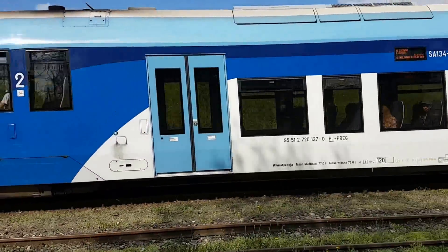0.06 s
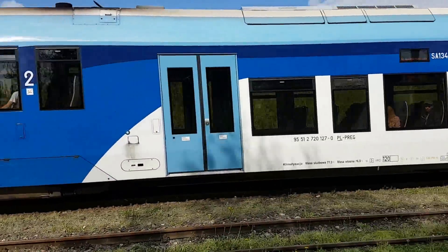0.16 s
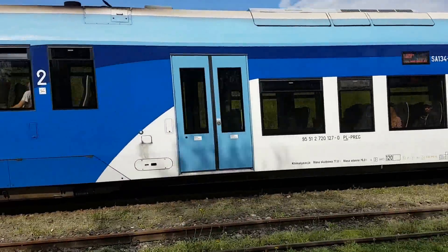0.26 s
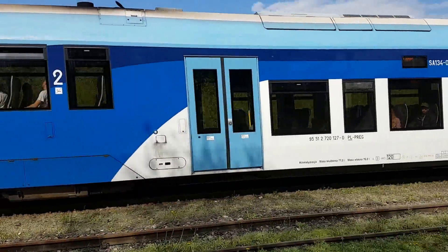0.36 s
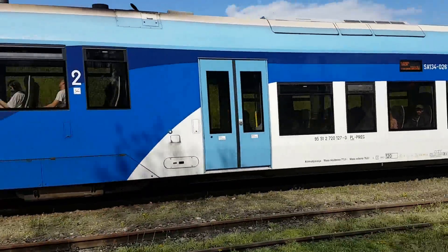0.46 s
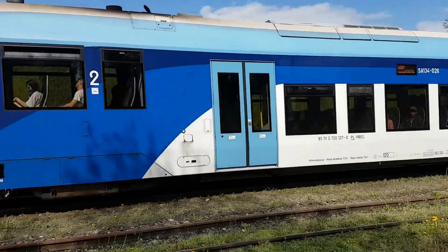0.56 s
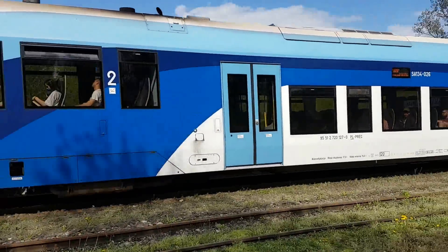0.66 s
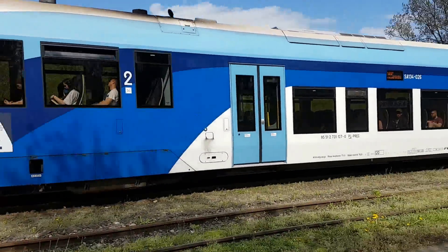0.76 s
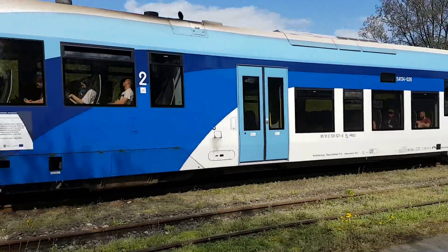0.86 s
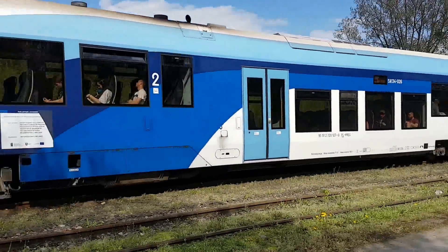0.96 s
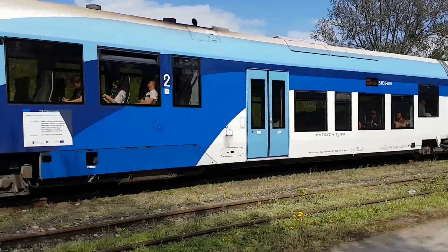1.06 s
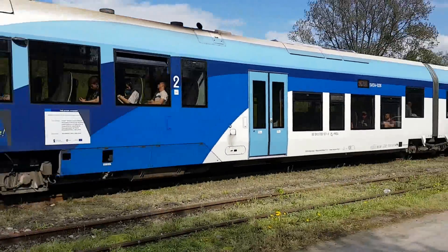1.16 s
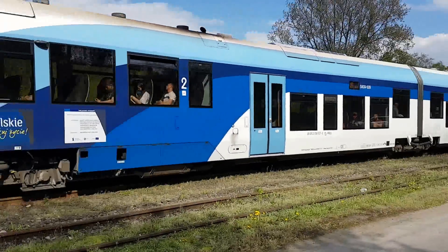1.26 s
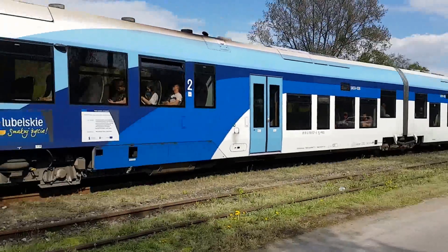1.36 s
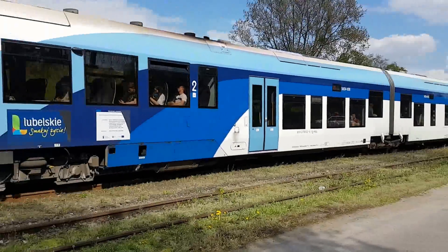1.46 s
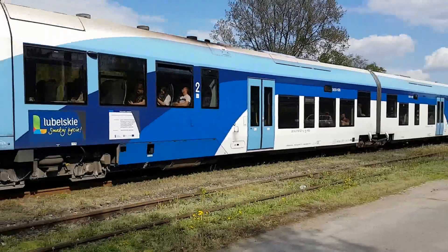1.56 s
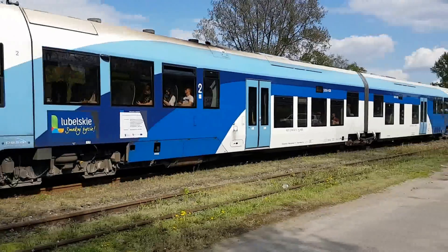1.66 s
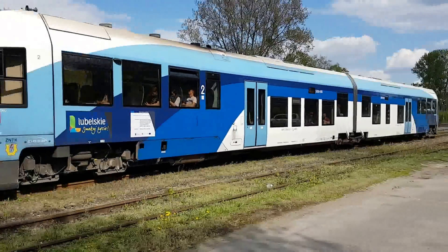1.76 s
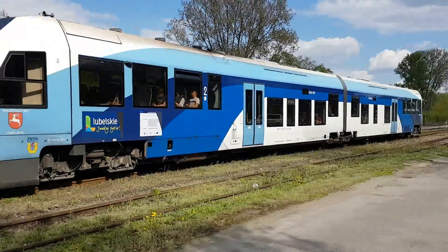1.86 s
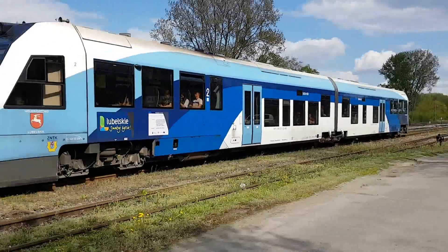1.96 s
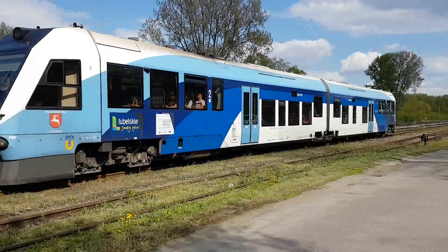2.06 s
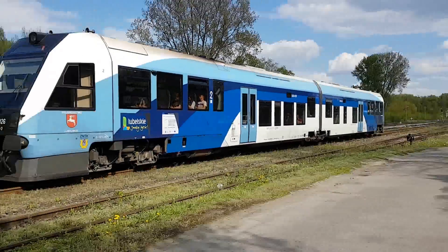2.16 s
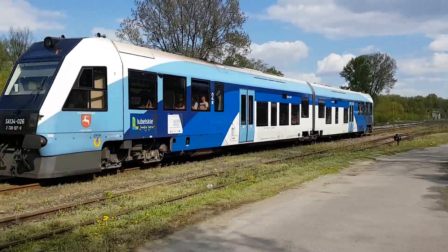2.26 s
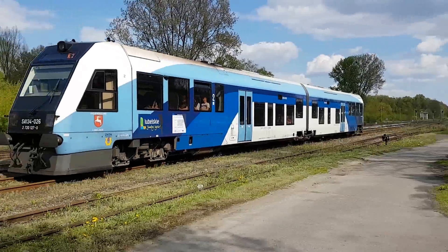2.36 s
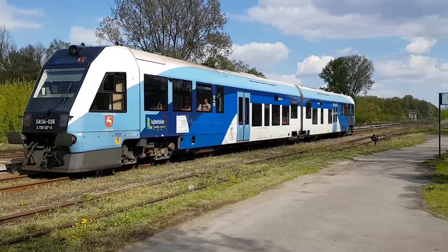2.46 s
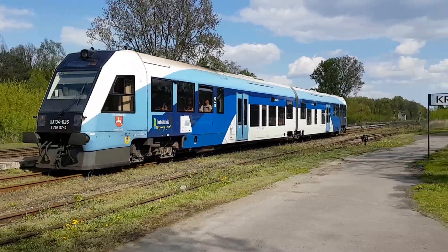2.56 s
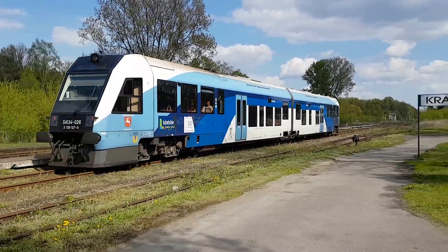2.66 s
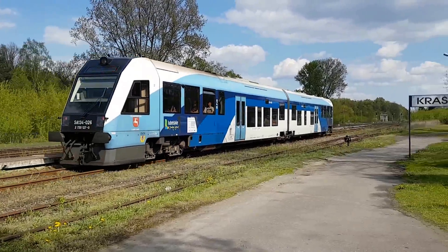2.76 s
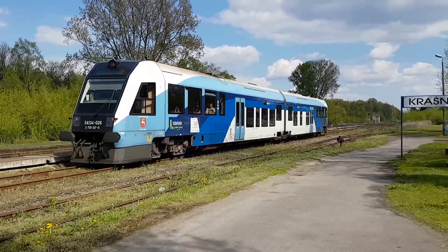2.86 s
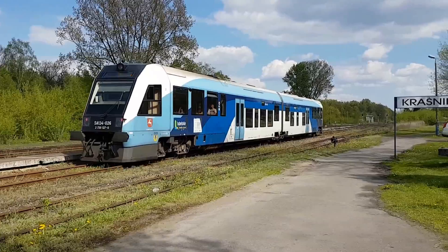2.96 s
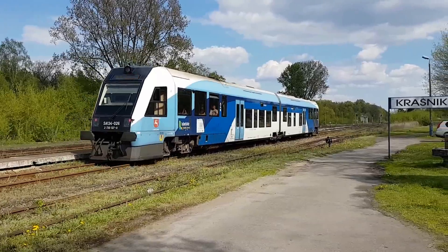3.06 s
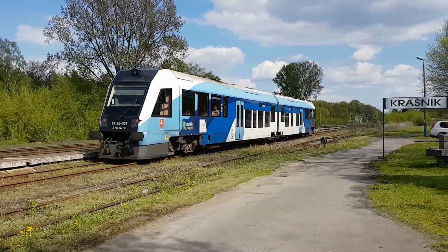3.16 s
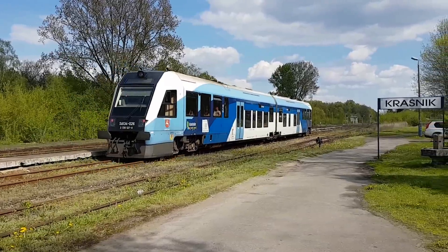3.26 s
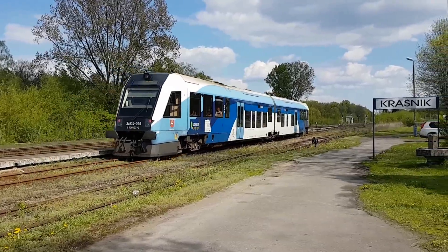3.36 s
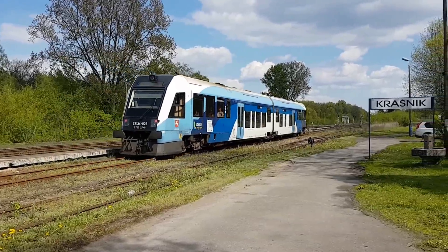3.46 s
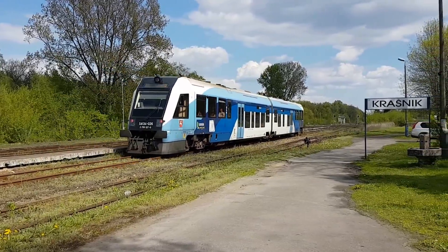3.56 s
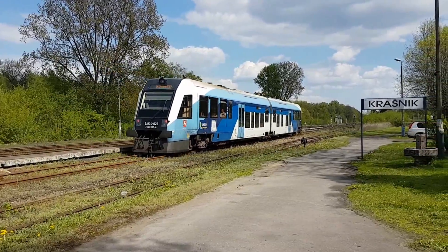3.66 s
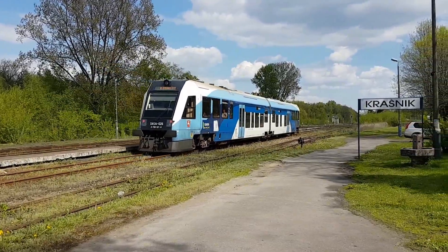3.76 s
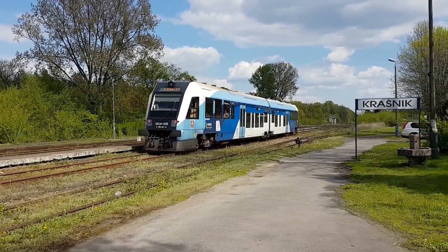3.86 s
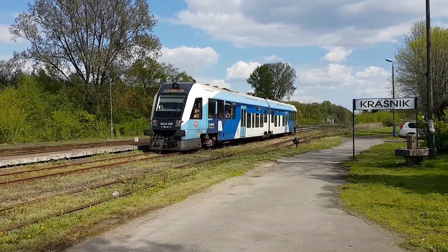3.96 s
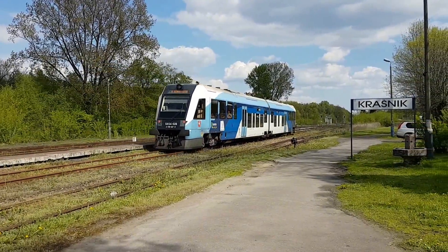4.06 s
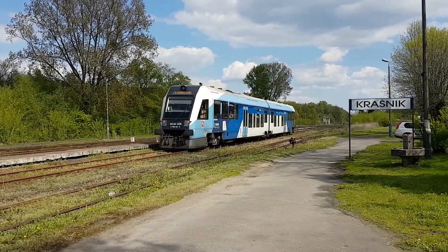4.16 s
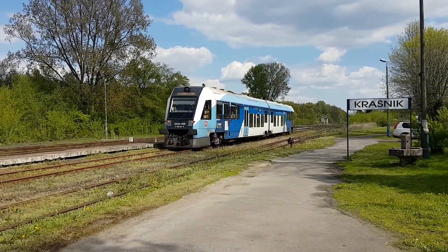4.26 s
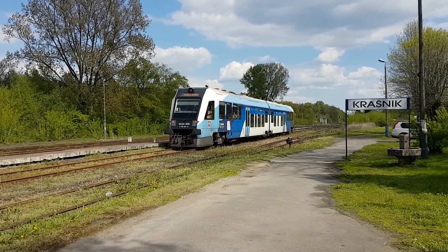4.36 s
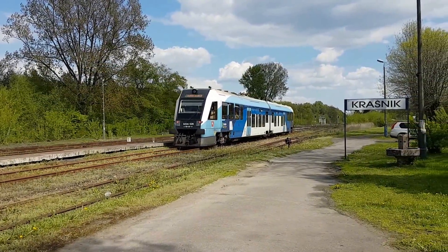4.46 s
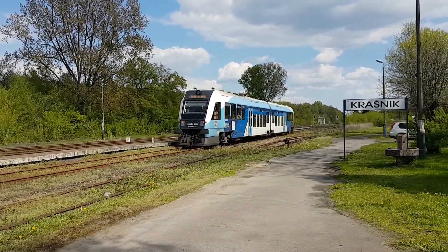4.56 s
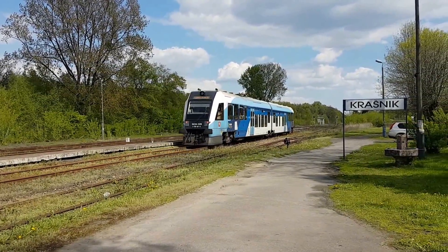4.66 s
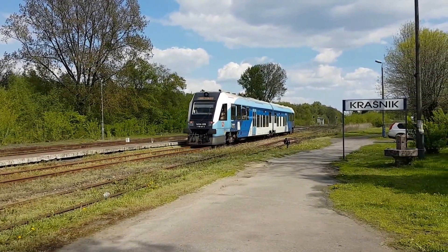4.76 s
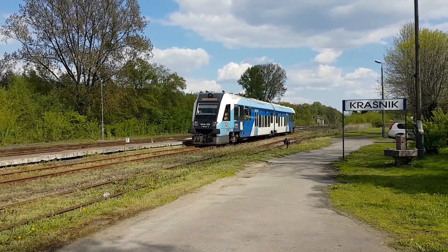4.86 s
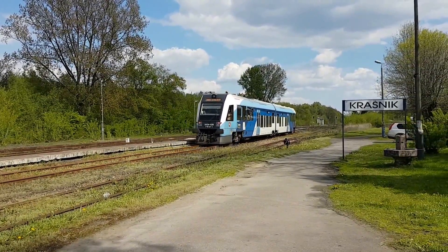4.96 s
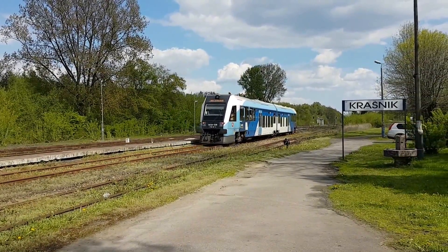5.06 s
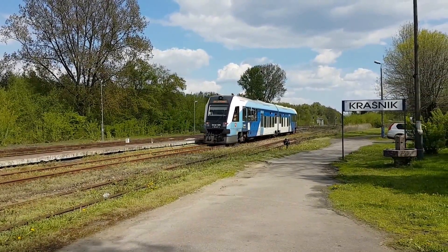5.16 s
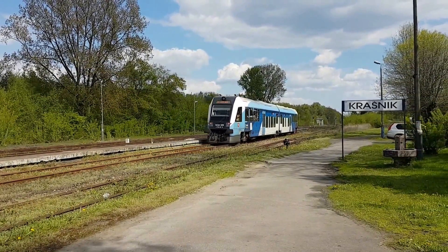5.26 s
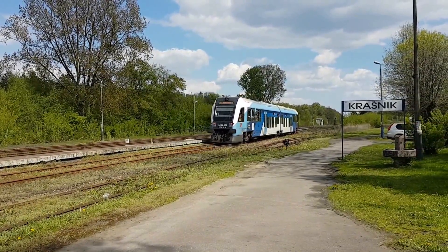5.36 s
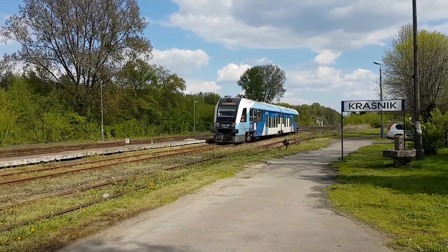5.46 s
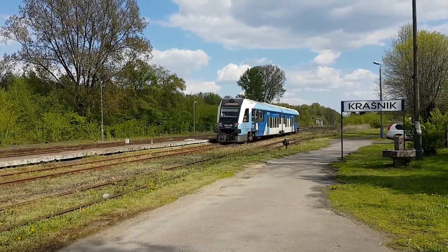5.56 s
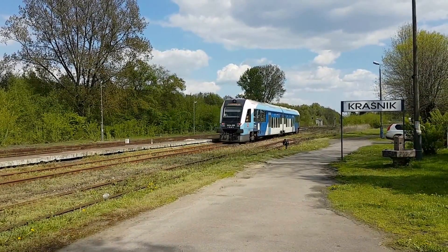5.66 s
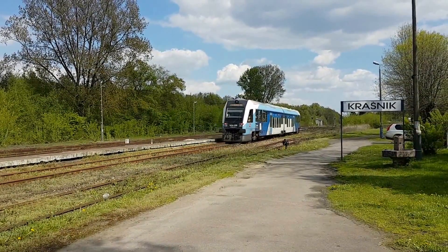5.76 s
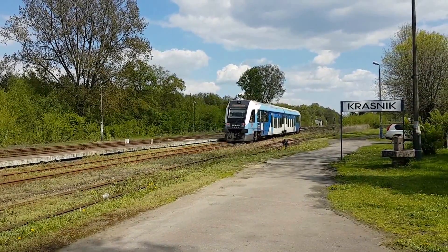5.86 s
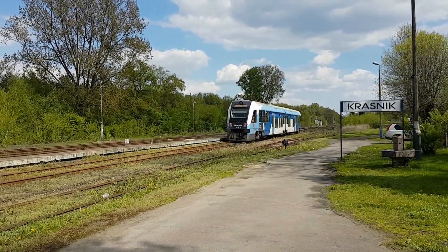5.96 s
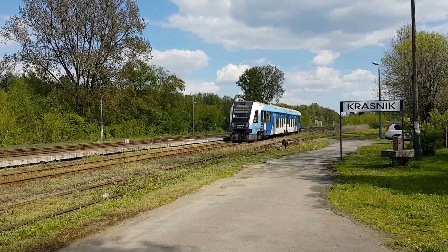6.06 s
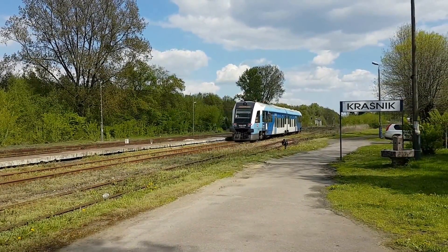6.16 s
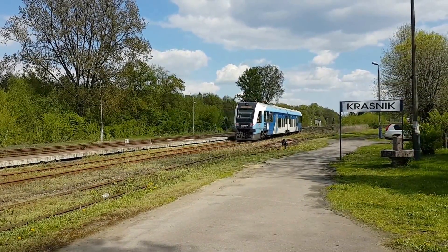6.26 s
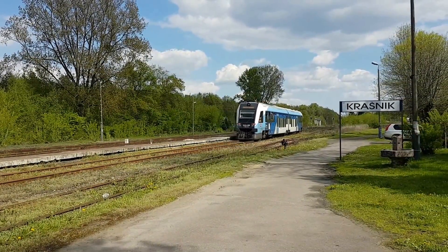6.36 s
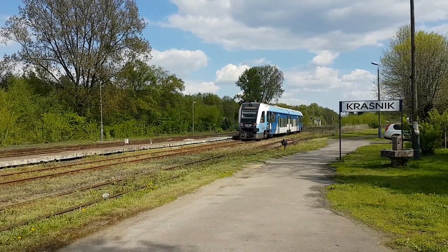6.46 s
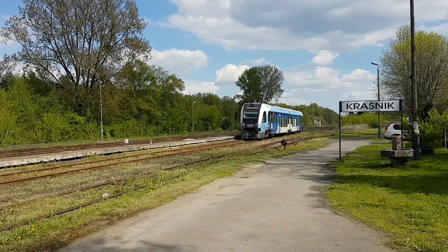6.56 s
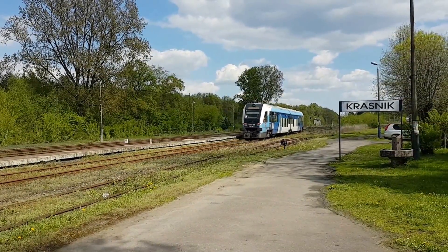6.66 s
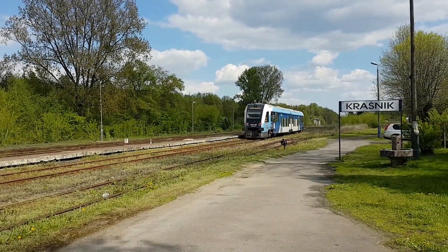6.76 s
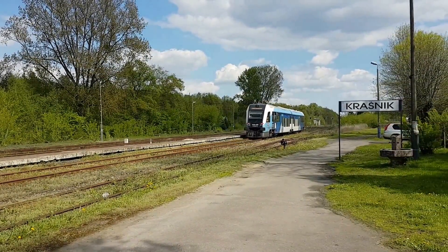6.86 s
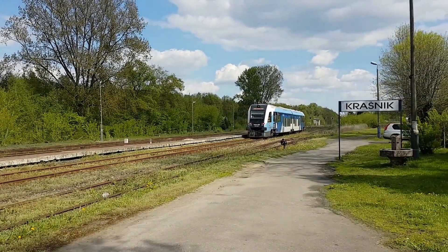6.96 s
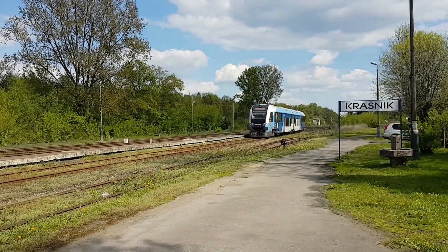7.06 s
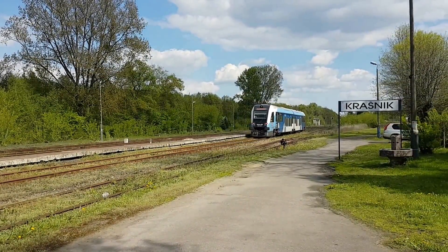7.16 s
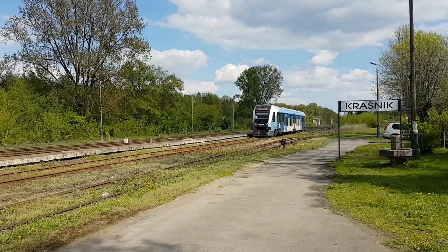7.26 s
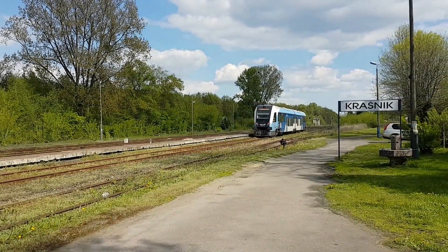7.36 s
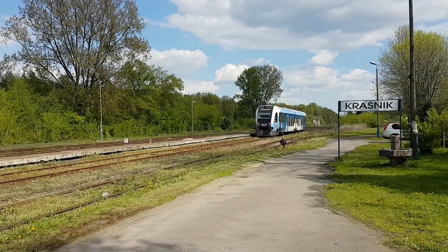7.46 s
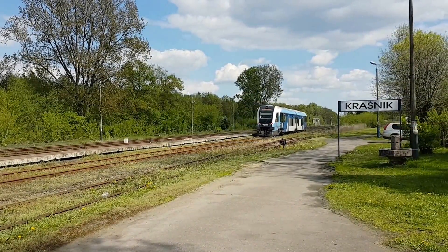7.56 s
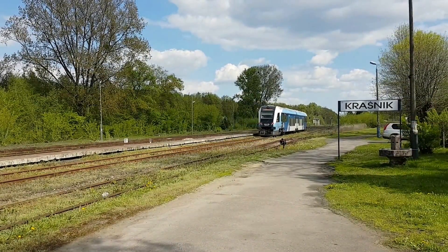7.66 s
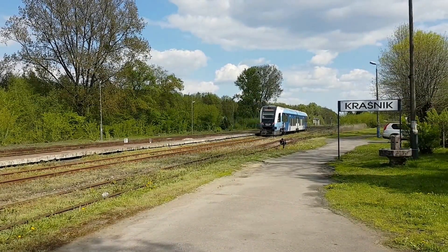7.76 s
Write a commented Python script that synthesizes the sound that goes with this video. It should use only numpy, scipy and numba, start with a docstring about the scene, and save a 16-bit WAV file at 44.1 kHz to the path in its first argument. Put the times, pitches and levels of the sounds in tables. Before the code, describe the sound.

A diesel railcar is already passing close to a phone beside the track. Its engine booms under throttle over rumbling, roaring wheels, and a high breathy turbocharger whistle peaks near 1.3 seconds, then sinks. By 2.3 seconds the engine has dropped to a throbbing idle, and the train steadily recedes. From 1.7 seconds wheels thump over rail joints, strongest near 2.8 seconds and in a cluster from 4.3 to 4.7. Gears hum low, wheels ring, and a thin flange whine peaks near 2.8 seconds with a faint hiss. Wind flutters on the microphone, with puffs on the right, hardest just after 5 seconds. Around 5.5 seconds the bass drops away. From 6 to about 7 seconds a bird gives a run of faint, short chips among the last distant joint clatters and two thin, close ticks. The faint train lingers over soft outdoor background until nearly 8 seconds.

```python
"""A two-car diesel railcar rolls past a phone beside the track and draws away down the line.
First the engine booms under throttle, wheels roar and the turbocharger whistles. By 2.3 s the
engine has dropped to a throbbing idle. From 1.7 s wheels thump over rail joints; gears hum, wheels
ring and a flange sings. Wind puffs hit the right microphone port, hardest near 5 s, then the bass
drops away. From 6 s a bird chips in the quiet, among the last joints and two thin ticks."""
import sys
import numpy as np
from scipy import signal
from scipy.fft import rfft, irfft, next_fast_len
from scipy.io import wavfile
from scipy.ndimage import uniform_filter1d, map_coordinates
from numba import njit

SR = 44100
rng = np.random.default_rng(int(sys.argv[2]) if len(sys.argv) > 2 else 0)


def unload_audio(sound):
    """Save the sound as a 16-bit wav file, at the path given as the first command line argument."""
    columns = np.transpose(np.atleast_2d(sound))
    # keep every value between -1 and 1, then stretch to whole-number steps
    steps = np.round(np.clip(columns, -1, 1) * 32767)
    wavfile.write(sys.argv[1], SR, steps.astype(np.int16))


N = 343967
TIME_S = np.arange(N) / SR

# engine speed: time_s, firing_hz
ENGINE_SPEED = [(0, 85), (.75, 85.87), (1.35, 78.97), (1.8, 64.8), (2.3, 51.94), (2.6, 48.98), (3.5, 50.84),
                (7.8, 52.87)]
# firings of one crank turn: level_db
CYLINDERS_DB = [0.5, -6, 5]
# exhaust pipe resonances: centre_hz, width_hz, gain_db
PIPE_MODES = [(180.3, 43, 0.5), (278.4, 72, -1), (322.4, 48, -2)]

# noise spectra: freq_hz, density_db
BOOM_COLOUR = [(80, -46), (120, -2), (160, 1), (210, 5), (260, 2.5), (340, -3), (385, -18), (500, -31),
               (700, -63)]
BAY_COLOUR = [(180, -39), (300, -22), (331, -1.5), (461, -14.5), (652, -9.5), (1000, -14), (1200, -17),
              (1570, -12.5), (2290, -19.5), (4080, -24.5), (6280, -32), (8040, -27.5), (9180, -38),
              (10800, -33), (15600, -39)]
RUMBLE_COLOUR = [(15, -42), (25, -37), (43, -10), (71, -9), (102, -3), (130, -2.5), (172, 0), (201, -1.5),
                 (225, -3.5), (259, -5.5), (305, -7.5), (393, -23), (520, -20), (680, -27), (1140, -120)]
WHEEL_COLOUR = [(220, -40), (380, -5), (686, -5), (1060, -9), (2100, -8), (3050, -13.5), (3400, -11),
                (6940, -22), (9190, -33.5), (13300, -35.5), (15600, -41)]
BREEZE_COLOUR = [(20, -32), (50, -2), (120, 6), (250, -18), (500, -28)]
FIELD_COLOUR = [(15, -47), (25, -33), (43, -10), (75, -1.5), (156, -12), (240, -38), (267, -8.5),
                (470, -14.5), (668, -11), (1240, -21), (7330, -43.5), (9340, -48), (15600, -46)]
# broad resonances of engine bay, wheels and rails: centre_hz, width_hz, lift_db
BAY_RINGS = [(690, 180, 3), (736, 34, 3), (990, 170, 4), (1530, 110, 1), (4170, 360, 2), (7830, 190, 4),
             (10060, 1500, 8), (13700, 1200, 3)]
WHEEL_RINGS = [(675, 230, 6), (1392.5, 410, 5.5), (2083.5, 350, 7.5), (2868, 145, 6), (3427, 190, 7),
               (4127, 490, 4.5), (4765, 330, 7), (5430, 130, 7.5), (7500, 1200, 2.5), (8200, 300, 9),
               (10050, 730, 7.5), (11900, 400, 7), (13400, 1320, 8.5)]

# swells: peak_s, peak_db, rise_s_per_10db, fall_s_per_10db
FIRING_SURGES = [(.4, -16, 0.5, 0.14), (.75, -18, 0.21, 0.13), (1.5, -22.5, 0.22, 0.45),
                 (2.05, -24, 0.24, 0.13)]
TURBO_SWELLS = [(.65, -39, 0.9, 1.004), (1.32, -32.5, 0.38, .2)]
BOGIE_SWELLS = [(0, -35, .5, 0.55)]
FLANGE_SWELLS = [(2.4, -50, 0.31, .8), (2.77, -44.5, 0.13, 0.07), (3.2, -54, 1.5, 0.65),
                 (4.3, -60, 3.5, .17), (6.3, -69.5, 3.5, 0.96)]
HISS_SWELLS = [(2.1, -65, .2, 2.5), (2.8, -55, .5, .8), (4.7, -66, 1.6, .3), (6.26, -63, .06, .07)]
GUSTS = [(.5, -36.5, 2.5, 1.9), (4.2, -39.5, .4, 1.9), (5.1, -27.5, 0.24, 0.24), (7.1, -46.5, 0.23, 0.36)]
# whistle centres: time_s, pitch_hz
TURBO_PITCH = [(0, 10900), (.6, 11000), (.95, 10900), (1.3, 10400), (1.75, 9100)]
FLANGE_PITCH = [(2.2, 7370), (4.3, 6550), (4.6, 6870), (5.5, 7200), (7.8, 7350)]
# gearbox hums: time_s, pitch_hz, level_db
LOW_HUM = [(1.2, 239.8, -26), (2.6, 231.2, -23.5), (3.8, 229.5, -38.5), (5.1, 232, -37),
           (7.8, 237.1, -42.5)]
HIGH_HUM = [(2.3, 297.5, -33.5), (3, 300.8, -34), (4.5, 307.3, -37.5)]

# rough track: centre_s, lift_db, half_length_s
ROUGH_TRACK = [(0, 2.5, 0.36), (4.8, 1, 0.27), (6.357, 4.5, 0.28), (7.197, 1, 0.23)]
# wheel treble: time_s, loss_at_7khz_db
TREBLE_LOSS = [(0, 5), (2, 6), (4.3, -3.5), (4.8, -1), (5.7, 3), (6.3, 11), (7.8, 11)]
# rail joints: time_s, gain_db, thud_hz, clatter_db, shudder_db
JOINTS = [(1.699, -22, 228, -20, 4), (2.14, -10.5, 201, -23, -3), (2.599, -14, 178, -29, -1),
          (2.759, -7, 96.9, -20, 3), (3.619, -20, 228, -46, 10), (4.289, -18.5, 191.7, -18, 7),
          (4.459, -17, 125.4, -16, 14), (4.579, -14, 169, -28, 10), (4.619, -14, 171, -21, -2),
          (4.678, -7, 98, -23.5, 1), (5.206, -13.5, 184, -21, 3), (6.215, -27.5, 102, -4.5, 16),
          (6.25, -25.5, 112.5, -22, 14), (6.429, -24, 106.8, -10.5, 17.5), (6.499, -25.5, 177, -10.5, 4.5),
          (6.87, -39.5, 161, 4, 28.5)]
# wind puffs: centre_s, gain_db, half_length_s
PUFFS = [(0.048, -15.5, .02), (3.75, -19, 0.017), (4.35, -30, 0.038), (5.002, -10, .012),
         (5.033, -16, 0.012), (5.11, -8, 0.012), (5.16, -3.5, 0.008), (5.42, -28, .03), (6.541, -32, 0.018),
         (7.157, -27, 0.013)]
# bird chips, close ticks: start_s, gain_db
CHIPS = [(6.0372, -43), (6.2136, -46), (6.364, -44), (6.5131, -40), (6.6445, -41), (6.778, -39.5),
         (6.9077, -44), (7.0996, -43)]
TICKS = [(6.127, -39), (6.3425, -42)]

# port likeness for train alongside, train ahead, open field: freq_hz, correlation
NEAR_ALIKE = [(60, 1), (290, 0.97), (640, 0.86), (1410, 0.81), (3100, 0.067), (6820, 0.14), (15000, 0.092)]
FAR_ALIKE = [(60, 1), (130, 1), (290, 0.5), (640, 1), (1410, 0.36), (3100, 0.45), (6820, 0.15),
             (15000, 0.15)]
FIELD_ALIKE = [(60, 1), (130, 0.95), (290, 0.91), (640, 0.77), (1410, -0.63), (3100, -0.33), (6820, -0.34),
               (15000, 0.037)]
# port mismatch: freq_hz, left_minus_right_db
PORT_BALANCE = [(60, -1.5), (200, -1), (380, -1.5), (700, 0.5), (1290, -1.5), (2400, 2.5), (4400, 1.5),
                (7200, 10), (9000, 0.5), (11000, 0), (15000, 1)]

TRACK_M, SPEED_M_S, TAIL_PASSES_S = 8.76, 9.72, 1.576


def engine(drop_db):
    """Firing tone plus uneven blows ringing the exhaust pipe; also returns the blows at mean 1."""
    idle_hz, run_hz, throb_hz = 56, 78.4, 6
    firing_hz, = curves(ENGINE_SPEED)
    throttle = np.clip((firing_hz - idle_hz) / (run_hz - idle_hz), 0, 1)
    floor_db = -37.5 + spread_db(linger_s=3.27) + 0.45 * drop_db  # the deep tone carries far
    tone_db = np.maximum(swells_db(FIRING_SURGES), floor_db) + 2 * (1 - throttle) * walk(rate_hz=16)
    bark_db = -29.5 + 11 * throttle + spread_db() + drop_db
    cycles = np.cumsum(firing_hz * (1 + 0.0043 * walk(rate_hz=15))) / SR
    firing = cycles.astype(int)
    scatter_db = 7.1 * rng.standard_normal(N // 100)[firing]
    blow_db = np.take(CYLINDERS_DB, firing % len(CYLINDERS_DB)) + scatter_db
    blows = undb(blow_db) * np.exp(-(cycles % 1) / 0.074)
    pipe = 0
    for k, (hz, width_hz, db) in enumerate(PIPE_MODES):
        centre_hz = np.full(N, float(hz))
        mode = svf(svf(blows, centre_hz, float(width_hz)), centre_hz, 2.4 * width_hz)
        pipe += (-1) ** k * undb(db) * mode
    throb = np.cos(phase_rad(throb_hz * (1 + .3 * walk(rate_hz=3))))
    tone = np.sqrt(2) * np.sin(2 * np.pi * cycles) * (1 + .65 * (1 - throttle) * throb)
    return undb(tone_db) * tone + undb(bark_db) * unit_rms(pipe), blows / np.mean(blows)


def boom():
    """Low roar that sags, then dies quickly as the engine slows."""
    db = -13 - 3 * TIME_S - 47 * after(1.77)
    return undb(db) * roar(BOOM_COLOUR, NEAR_ALIKE, flicker_db=0.5, swell_db=0.37)


def engine_bay(blows):
    """Bay roar, partly gated by combustion knock once a firing."""
    gain = undb(-21 - 12 * after(1.14)) * (1 + 0.028 * (blows - 1))
    return gain * roar(BAY_COLOUR, NEAR_ALIKE, flicker_db=-0.26, swell_db=1.13, rings=BAY_RINGS)


def rail_rumble(lift_db):
    """The near rails carry the rumble on after the last cab."""
    db = -19.5 + spread_db(linger_s=0.55) + lift_db
    return undb(db) * roar(RUMBLE_COLOUR, NEAR_ALIKE, flicker_db=-1.26, swell_db=-0.26)


def wheel_roar(db):
    """Rolling noise with broad rings of wheels and rails."""
    loss_db, = curves(TREBLE_LOSS)
    return undb(db) * roar(WHEEL_COLOUR, FAR_ALIKE, flicker_db=.7, swell_db=.45,
                           loss_at_7khz_db=loss_db, rings=WHEEL_RINGS)


def rail_joints():
    """Each wheel drop thuds, shakes the sleepers and rattles rail and ballast."""
    out, t = np.zeros((2, N)), np.arange(SR // 4) / SR
    tail = np.minimum(t / 0.026, 1) * np.exp(-t / 0.033)
    for time_s, db, thud_hz, clatter_db, shudder_db in JOINTS:
        thud = np.sin(2 * np.pi * thud_hz * t) * (t / 0.011) * np.exp(1 - t / 0.0077)
        noise = rng.standard_normal((4, len(t)))
        shudder = undb(shudder_db) * bandpass(noise[3], 120, 340, order=3)
        rattle = bandpass(noise[0] + 0.64 * noise[1:3], 400, 3200, order=3)
        clank = 3.7 * bandpass(noise[0], 450, 900, order=2)
        clatter = undb(clatter_db) * (rattle + clank)
        add(out, time_s - .006, undb(db) * (thud + tail * (shudder + clatter)))
    return out


def gear_hum(table, waver_db, drift):
    """Fluttering gearbox tone, faded in and out at the ends of its table."""
    hz, db = curves(table)
    fade = ramp(table[0][0], 0.31) * np.clip((table[-1][0] + .1 - TIME_S) / 0.086, 0, 1)
    tone = np.sqrt(2) * np.sin(phase_rad(hz * (1 + drift * walk(rate_hz=20))))
    return fade * undb(db + waver_db * walk(rate_hz=18)) * tone


def turbocharger():
    """High whistle that sinks as the engine slows."""
    return whistle(curves(TURBO_PITCH)[0], swells_db(TURBO_SWELLS), width_hz=1100., waver_db=.7)


def wheel_ring(wheel_db):
    """The strongest wheel ring: swells as a bogie goes by, and again towards 2.7 s."""
    open_s = 2.7
    db = wheel_db - 8.5 - 7 * np.maximum(open_s - TIME_S, 0) - 1.5 * after(open_s)
    db = np.maximum(db, swells_db(BOGIE_SWELLS))
    return whistle(2148 - 24 * TIME_S, db, width_hz=300., waver_db=3.2)


def flange_sing():
    """Sinks as the cars draw away, then returns faintly."""
    return whistle(curves(FLANGE_PITCH)[0], swells_db(FLANGE_SWELLS), width_hz=600., waver_db=.9)


def tail_hiss():
    """High hiss behind the last cab."""
    return whistle(np.full(N, 10240.), swells_db(HISS_SWELLS), width_hz=1500., waver_db=.5)


def wind():
    """Unrelated low flutter on each port, pressure puffs on the right one."""
    flutter = roar(BREEZE_COLOUR, alike=[(20, 0.004), (500, 0)], flicker_db=4, swell_db=2)
    out = undb(swells_db(GUSTS)) * flutter
    for centre_s, db, half_s in PUFFS:
        t = np.arange(-int(3 * half_s * SR), int(3 * half_s * SR)) / SR
        wobble = 0.49 * np.cos(2 * np.pi * 94 * t) * bell(t, half_s)
        snap = 0.85 * bell(t, 0.078 * half_s)
        add(out[1], max(centre_s + t[0], 0), -undb(db) * (wobble + snap))
    return out


def bird():
    """Each chip is a hoarse flick down in pitch with a low tail."""
    top_hz, low_hz, fall_s = 2550, 1800, .0015
    out, t = np.zeros((2, N)), np.arange(SR // 20) / SR
    flick_hz = low_hz + (top_hz - low_hz) / (1 + np.exp((t - .009) / fall_s))
    pan_db = np.array([[-3], [1]])
    for (start_s, db), (detune, tail) in zip(CHIPS, rng.standard_normal((len(CHIPS), 2))):
        tone = np.sin(phase_rad((1 + .02 * detune) * flick_hz))
        rasp = .55 + .7 * uniform_filter1d(rng.standard_normal((2, len(t))), size=40) * np.sqrt(40)
        envelope = bell(t - .005, .005) + undb(-3 + 2 * tail) * bell(t - .015, .006)
        add(out, start_s, undb(db + pan_db) * rasp * envelope * tone)
    return out


def ticks():
    """Dry treble clicks close by."""
    out, t = np.zeros((2, N)), np.arange(SR // 30) / SR
    envelope = np.minimum(t / 0.0074, 1) * np.exp(-t / 0.0078)
    for start_s, db in TICKS:
        click = bandpass(rng.standard_normal((2, len(t))), 10800, 14500, order=6)
        add(out, start_s, undb(db) * envelope * click)
    return out


def open_field():
    """Faint, steady background noise."""
    return undb(-45.5) * roar(FIELD_COLOUR, FIELD_ALIKE, flicker_db=.5, swell_db=.2)


def spread_db(linger_s=0):
    """Spherical spreading as the tail draws away."""
    return -20 * np.log10(np.hypot(1, SPEED_M_S * after(TAIL_PASSES_S + linger_s) / TRACK_M))


def lead_left(train):
    """The right port hears the train late until it swings ahead."""
    delay_s = 0.00024 * (1 - ramp(start_s=0.49, length_s=2.15))
    right = map_coordinates(train[1], [np.arange(N) - delay_s * SR], order=3, mode="nearest")
    return np.array([train[0], right])


def roar(colour, alike, flicker_db, swell_db, loss_at_7khz_db=0, rings=()):
    """Stereo noise in octave bands that swell together and flicker alone; rms 1 before band gains."""
    size = next_fast_len(N)
    hz = np.maximum(np.arange(size // 2 + 1) * SR / size, 1)
    db = along(colour, hz) + sum(lift * bell(hz - centre, width / 2) for centre, width, lift in rings)
    likeness = np.clip(along(alike, hz), -1, 1)
    mid, side = rfft(rng.standard_normal((2, size)))
    pair = undb(db) * (np.sqrt(1 + likeness) * mid + np.sqrt(1 - likeness) * np.array([side, -side]))
    pair *= size / np.linalg.norm(pair)
    out, swell = 0, walk(rate_hz=5.1)
    for band_hz in 31.25 * 2 ** np.arange(10):
        if colour[0][0] / 2 < band_hz < colour[-1][0] * 2:
            share = np.cos(np.pi / 2 * np.clip(np.log2(hz / band_hz), -1, 1)) ** 2
            gain_db = swell_db * swell + flicker_db * walk(rate_hz=12) - loss_at_7khz_db * band_hz / 7000
            out += undb(gain_db) * irfft(pair * share, size)[:, :N]
    return out


def whistle(hz, db, width_hz, waver_db):
    """Narrow breathy band on a drifting centre, unlike at the two ports."""
    hz = hz * (1 + .006 * walk(rate_hz=8))
    band = np.array([svf(svf(rng.standard_normal(N), hz, width_hz), hz, width_hz) for _ in "LR"])
    return unit_rms(band) * undb(db + waver_db * walk(rate_hz=14))


@njit
def svf(x, hz, width_hz):
    """State-variable band-pass, gain 1 at its moving centre."""
    y, band_state, low_state = np.empty(len(x)), 0., 0.
    for i in range(len(x)):
        g, damping = np.tan(np.pi * hz[i] / SR), width_hz / hz[i]
        band = (band_state + g * (x[i] - low_state)) / (1 + g * (g + damping))
        band_state, low_state = 2 * band - band_state, low_state + 2 * g * band
        y[i] = damping * band
    return y


def bandpass(x, low_hz, high_hz, order):
    return signal.sosfilt(signal.butter(order, [low_hz, high_hz], "bandpass", fs=SR, output="sos"), x)


def walk(rate_hz):
    """Random steps smoothed twice; spread near 1."""
    hold = int(SR / rate_hz)
    steps = np.repeat(rng.standard_normal(N // hold + 1), hold)
    return np.sqrt(2) * uniform_filter1d(uniform_filter1d(steps, hold), hold)[:N]


def swells_db(table):
    """Loudest swell at every sample."""
    return np.max([db - 10 * np.maximum((peak_s - TIME_S) / rise, (TIME_S - peak_s) / fall)
                   for peak_s, db, rise, fall in table], axis=0)


def curves(table):
    """Columns of a time table at every sample."""
    time_s, *columns = np.transpose(table)
    return [np.interp(TIME_S, time_s, column) for column in columns]


def along(table, hz):
    """Spectrum table read on a log-frequency axis."""
    freq_hz, values = np.transpose(table)
    return np.interp(np.log(hz), np.log(freq_hz), values)


def add(out, start_s, sound):
    start = int(start_s * SR)
    count = min(sound.shape[-1], N - start)
    out[..., start:start + count] += sound[..., :count]


def after(start_s):
    return np.maximum(TIME_S - start_s, 0)


def ramp(start_s, length_s):
    return np.clip(after(start_s) / length_s, 0, 1)


def bell(x, half_width):
    return np.exp(-(x / half_width) ** 2)


def phase_rad(hz):
    return 2 * np.pi * np.cumsum(hz) / SR


def undb(db):
    return 10 ** (np.asarray(db) / 20)


def unit_rms(x):
    return x / np.sqrt(np.mean(x ** 2))


def scene():
    """The receding train over field, wind, bird and ticks."""
    drop_db = -10 * ramp(start_s=5.22, length_s=0.37)  # the bass drops away
    rough_db = sum(db * bell(TIME_S - centre_s, half_s) for centre_s, db, half_s in ROUGH_TRACK)
    grass_loss_db = 1.09 * after(TAIL_PASSES_S)
    wheel_db = -29.5 + spread_db() - grass_loss_db + rough_db
    exhaust, blows = engine(drop_db)
    train = exhaust + rail_rumble(drop_db + 0.46 * rough_db) + boom() + engine_bay(blows)
    train += wheel_roar(wheel_db)
    field = open_field()
    hums = gear_hum(LOW_HUM, waver_db=3.5, drift=0.01219) + gear_hum(HIGH_HUM, waver_db=2, drift=0.00435)
    train += undb(drop_db) * hums
    train += turbocharger() + flange_sing() + wheel_ring(wheel_db) + tail_hiss() + rail_joints()
    return lead_left(train) + field + wind() + bird() + ticks()


def record(dry):
    """The two ports differ in colour; the phone rounds the loudest peaks and cuts the top."""
    ceiling, top_hz = 0.8, 15740
    size = next_fast_len(N)
    half_db = along(PORT_BALANCE, np.maximum(np.arange(size // 2 + 1) * SR / size, 1)) / 2
    ports = irfft(rfft(dry, size) * undb([half_db, -half_db]), size)[:, :N]
    rounded = ceiling * np.tanh(ports / ceiling)
    return signal.sosfilt(signal.ellip(14, .2, 60, top_hz, fs=SR, output="sos"), rounded)


dry = scene()
out = record(dry)
unload_audio(out)
```